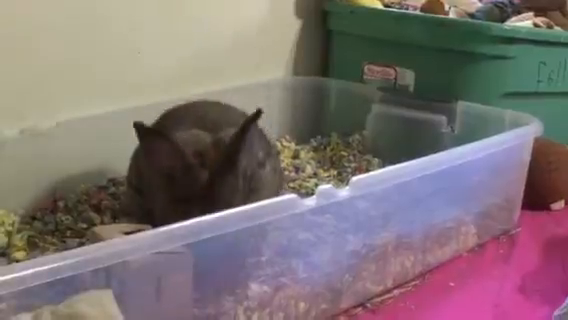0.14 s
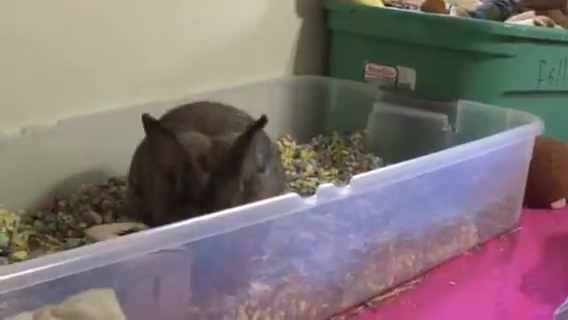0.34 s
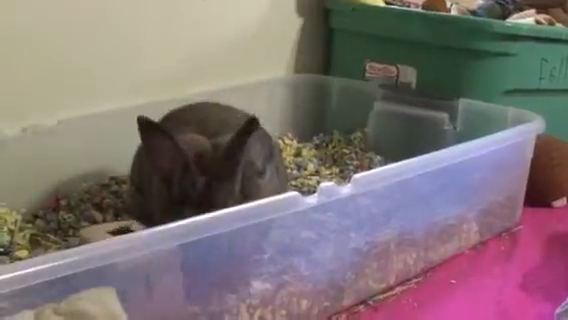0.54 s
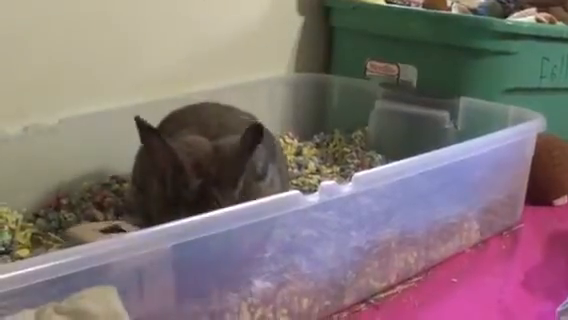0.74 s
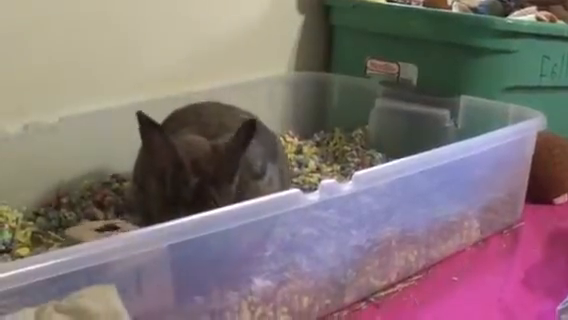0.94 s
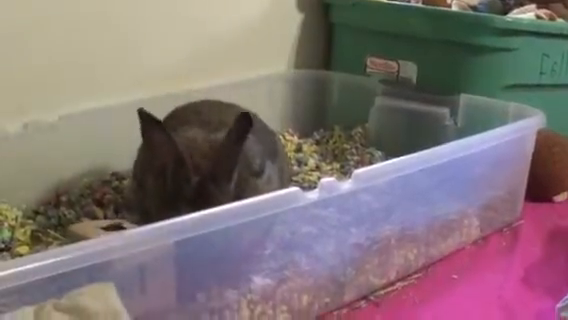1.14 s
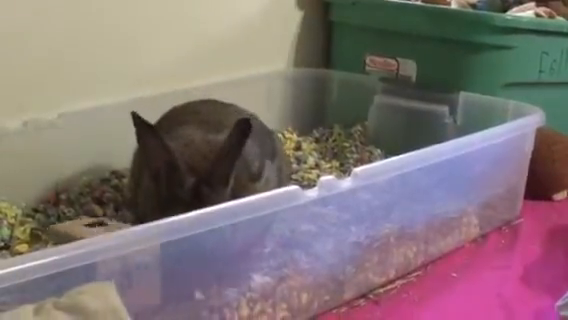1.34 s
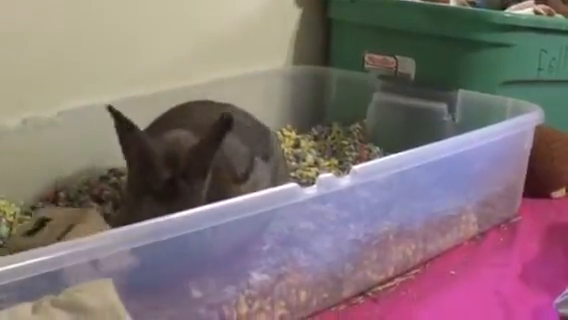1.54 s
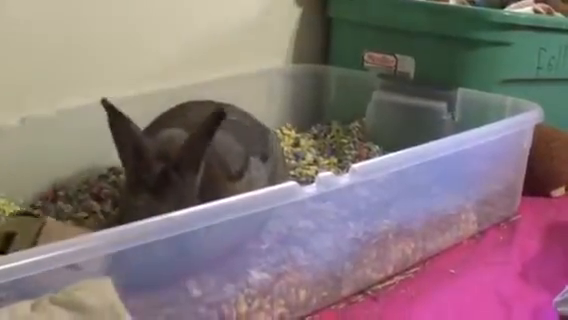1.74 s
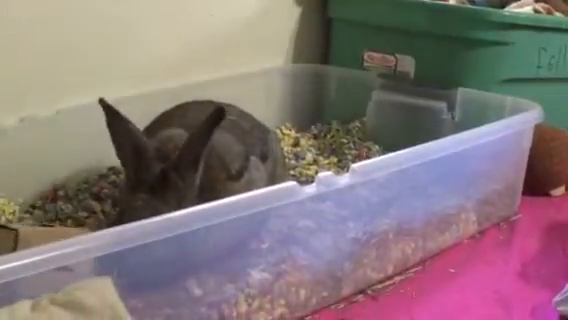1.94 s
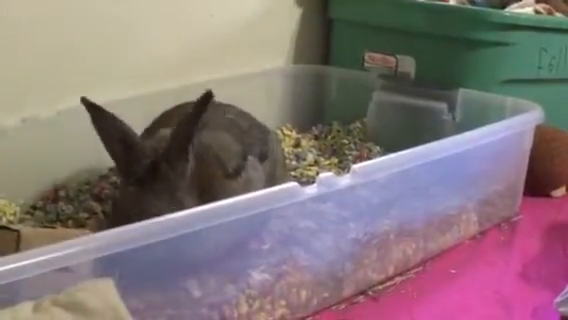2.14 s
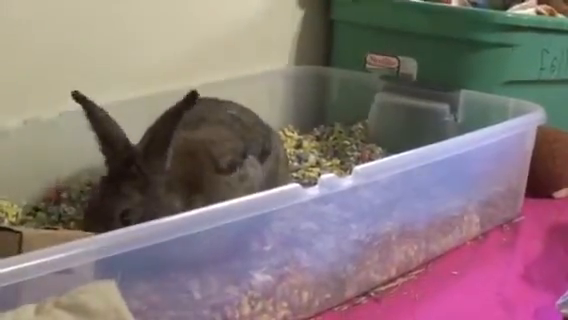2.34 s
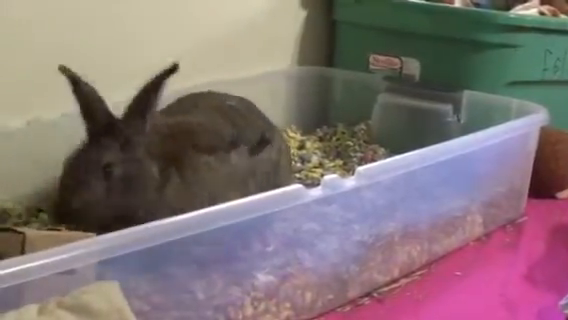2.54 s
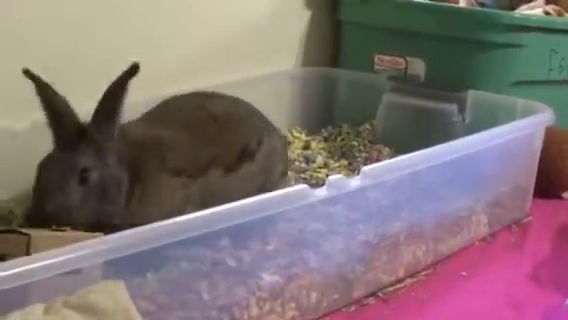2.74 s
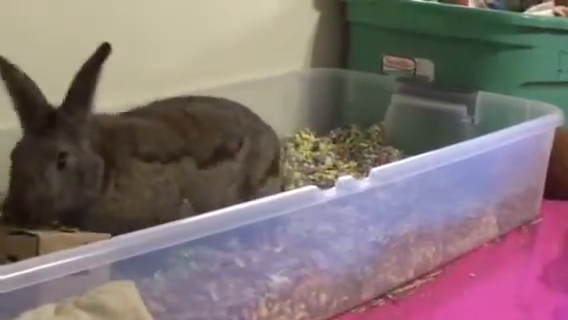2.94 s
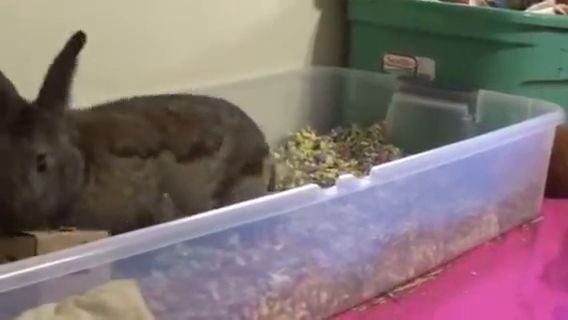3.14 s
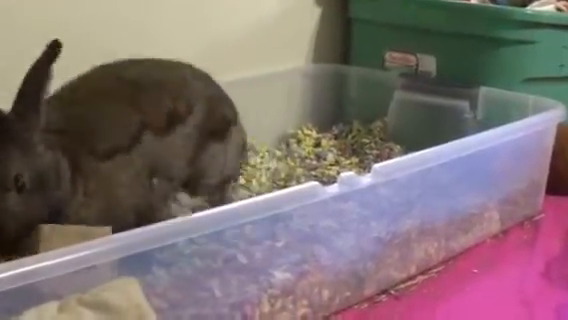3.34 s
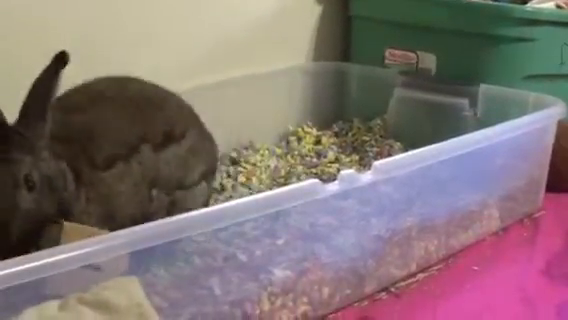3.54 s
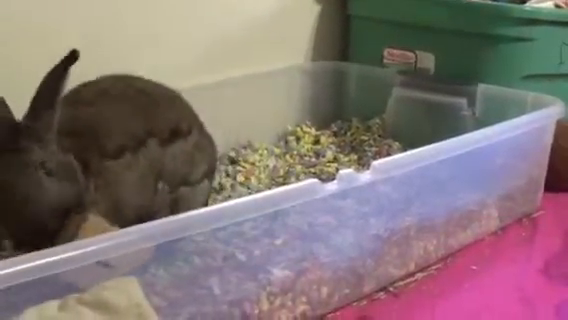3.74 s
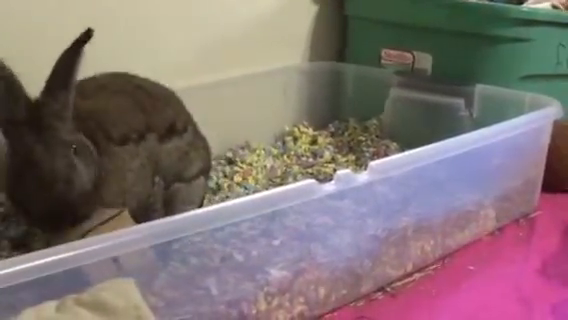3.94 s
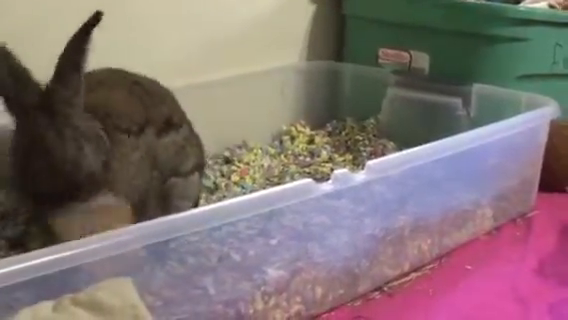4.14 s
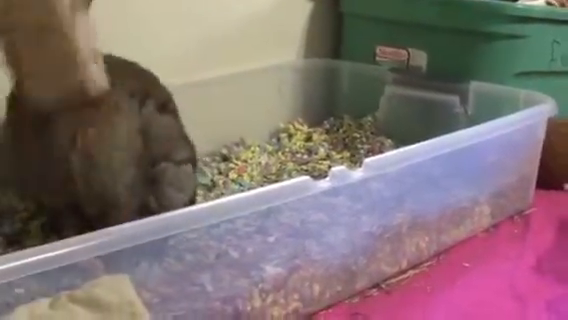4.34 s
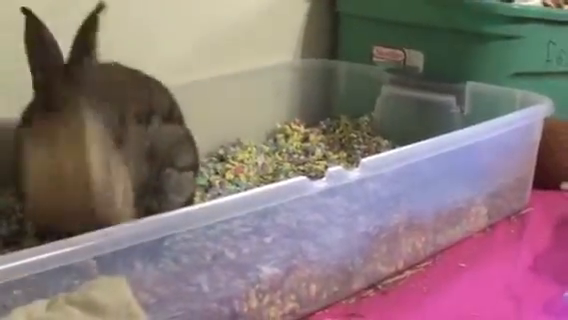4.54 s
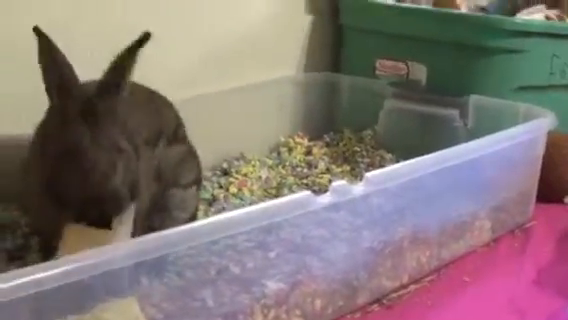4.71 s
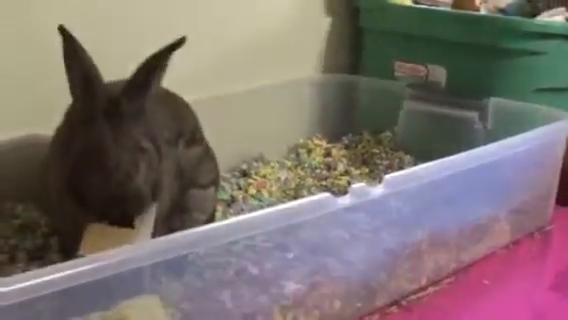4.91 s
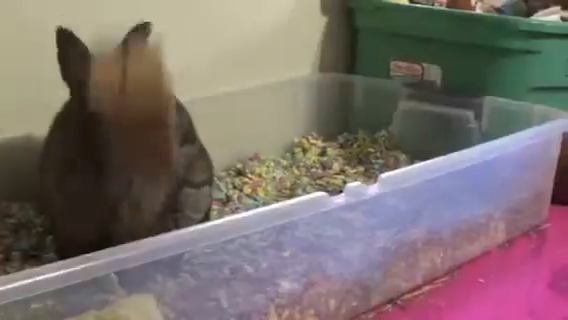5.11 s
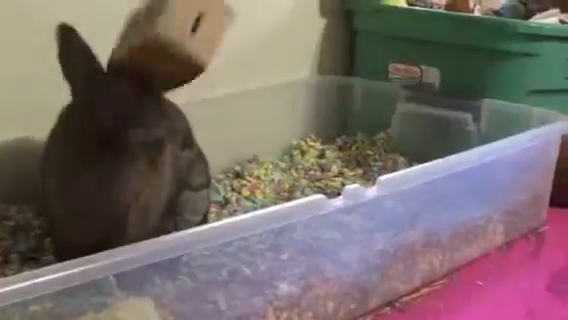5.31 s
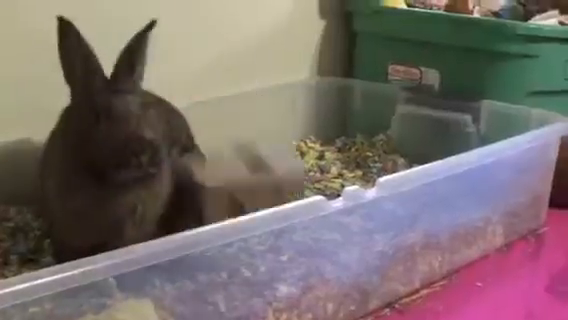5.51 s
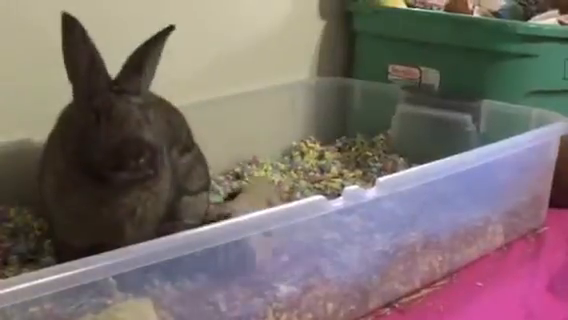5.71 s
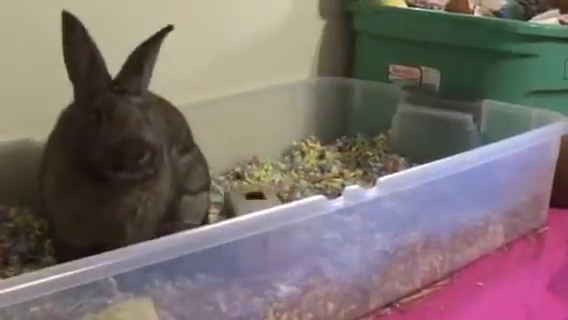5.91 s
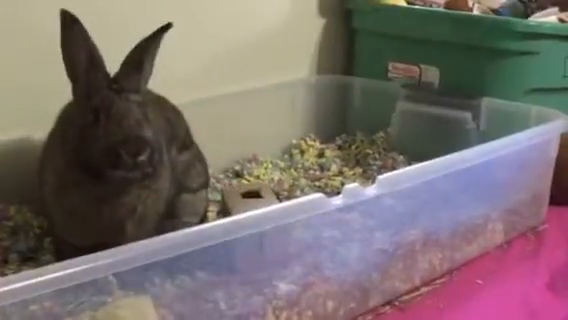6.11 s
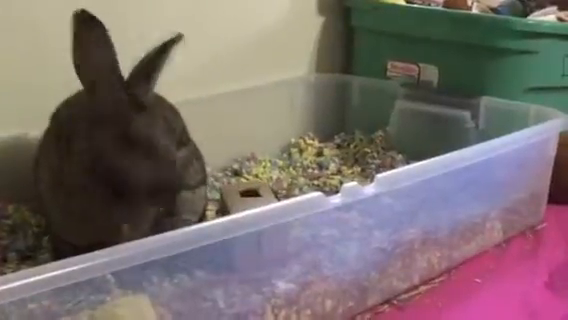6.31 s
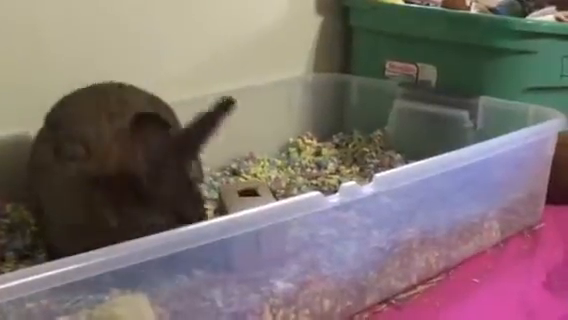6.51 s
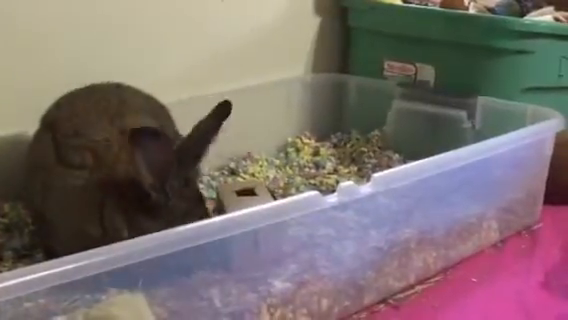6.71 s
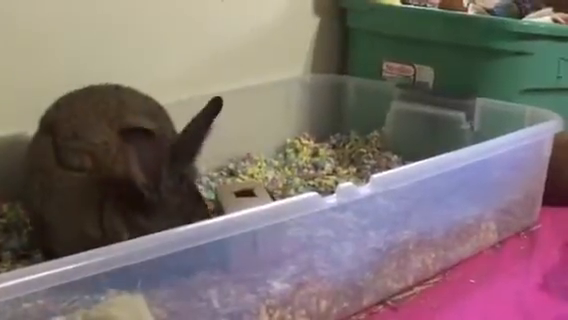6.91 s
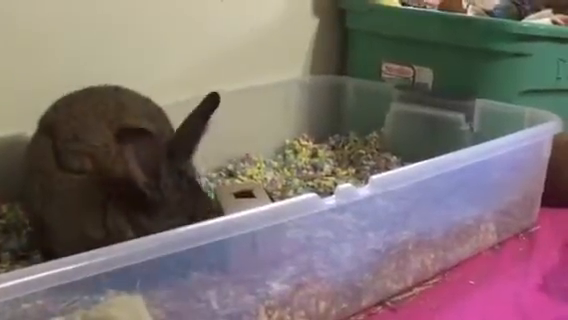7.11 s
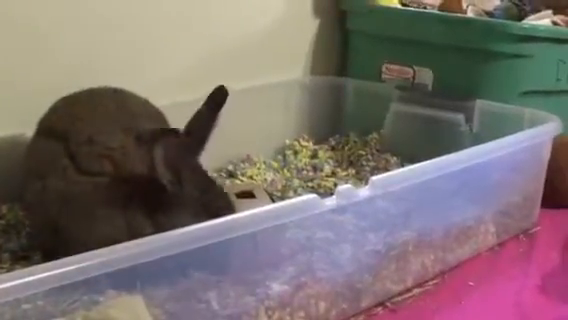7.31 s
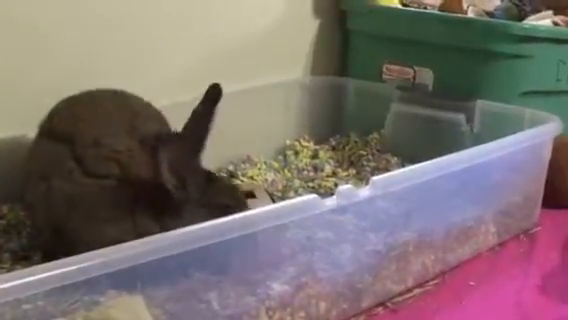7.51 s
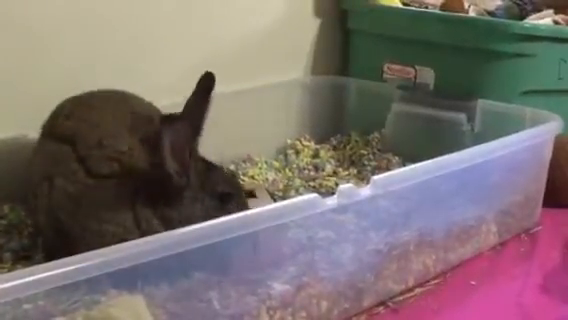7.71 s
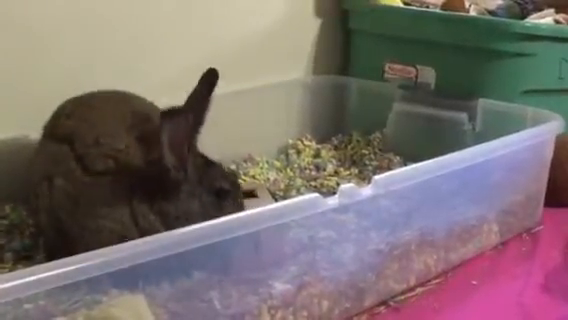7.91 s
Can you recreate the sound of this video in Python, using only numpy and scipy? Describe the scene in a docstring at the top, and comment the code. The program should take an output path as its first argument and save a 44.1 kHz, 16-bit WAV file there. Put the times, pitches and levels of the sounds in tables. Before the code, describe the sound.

A rabbit scrapes and tosses a small cardboard box in a plastic tub, with rustling bedding, sharp knocks and hollow thumps over low room rumble.

```python
"""Soft scrapes and sharp knocks of cardboard: a rabbit drags, shakes and tosses a small box
over loose paper bedding in a plastic tub. Each touch rings the panels of the box and rustles
the bedding, while paws and the landing box thump the tub. Underneath lie the low rumble of
a quiet room and the hiss of the microphone."""
import sys
import numpy as np
from scipy import signal
from scipy.io import wavfile
from scipy.ndimage import uniform_filter1d

SR = 44100
rng = np.random.default_rng(int(sys.argv[2]) if len(sys.argv) > 2 else 0)


def unload_audio(sound):
    """Save the sound as a 16-bit wav file, at the path given as the first command line argument."""
    columns = np.transpose(np.atleast_2d(sound))
    # keep every value between -1 and 1, then stretch to whole-number steps
    steps = np.round(np.clip(columns, -1, 1) * 32767)
    wavfile.write(sys.argv[1], SR, steps.astype(np.int16))


N = 350815

# Drags through the bedding. Each row: crest in seconds, level in dB, swell and fade in seconds per
# 20 dB, rustle in relative dB, pitch of the rubbed panel in Hz. A negative swell leaves a faint tail.
STROKES = [(0.56, -74.5, 0.36, 0.2, -4, 1580), (0.697, -70, 0.05, 0, -11, 1950),
           (0.742, -57.5, 0.0547, 0.14, -7.5, 2130), (0.77, -65, 0.1, 0.18, -13, 1220),
           (0.82, -61.5, 0.21, 0.03, -6, 2100), (0.828, -70, 0.1, 0.03, -12, 1250),
           (0.915, -65, 0, 0.15, -6.5, 2000), (1.12, -73, 0.2, 0.46, -7, 1620),
           (1.395, -63.5, 0.02, 0.04, -4, 1100), (1.43, -61, 0.03, 0.22, -12, 1260),
           (1.476, -55, 0.13, 0.1039, -5.5, 1950), (1.52, -60.5, 0.13, 0.03, -5, 1220),
           (1.67, -67, 0.15, 0.08, -20, 1120), (1.665, -64, 0.05, 0.12, -25, 1830),
           (1.76, -69, 0.05, 0.2, -25, 1830), (1.63, -60, 0.14, 0.157, -9.5, 1940),
           (1.8, -70, 0.1, 0.32, -2.5, 2306), (1.944, -56.5, 0.1, 0.06, -16, 1861),
           (2.115, -73, 0.1138, 0.23, -12, 1858), (2.7, -75, 0.3, 0.3, -6.5, 1400),
           (2.75, -64, 0.01, 0.05, -4, 1600), (2.822, -65, 0.0419, 0.16, -8.5, 1440),
           (3.19, -68.5, 0.06, 0.05, -14, 1816), (3.3, -69, 0.1, 0.06, -11, 1791),
           (3.44, -58, 0.03, 0.14, -6, 1650), (3.48, -55, 0.07, 0.0654, -7.5, 1976),
           (3.608, -62.5, 0.2, 0.0122, -17, 1470), (3.858, -74, 0.1, 0.2, -25, 1177),
           (4.06, -65, 0.5546, 0.26, -7, 1490), (4.185, -64, 0.1, 0.32, -9.5, 2000),
           (4.51, -49, 0.03, 0.05, -14, 1050), (4.559, -48, 0.015, 0.03, -4, 1740),
           (4.522, -46, 0.05, 0.07, -10, 986), (4.569, -35, 0.01, 0.0784, -8, 1190),
           (4.598, -42.5, 0.0356, 0.06, -16, 1140), (4.63, -47, 0.05, 0.08, -14, 1830),
           (4.665, -45.5, 0.16, 0.16, -19, 1490), (4.721, -29.5, 0.0288, 0.0281, -12, 1857),
           (4.7, -41, 0.02, 0.02, -3.5, 1400), (4.744, -40.5, 0.03, 0.0874, -5.5, 2000),
           (4.78, -51.5, 0.055, 0.0743, -9.5, 1320), (5.156, -67.5, 0.2, 0.09, -1, 1540),
           (5.25, -68.5, 0.5, 0, -4, 1271), (5.375, -47.5, 0.0151, 0.197, -12, 1125),
           (5.378, -49, -0.02, 0.09, -17, 1790), (5.428, -44.5, 0.0935, 0.0425, -11, 1360),
           (5.438, -47, 0.07, 0.035, -13, 1770), (5.469, -46.5, 0.04, 0.1135, -14.5, 1040),
           (5.577, -50, 0.0038, 0.05, -5.5, 1270), (5.603, -53, 0.06, 0.05, -14, 1110),
           (5.685, -39.5, -0.02, 0.09, -5.5, 1880), (5.703, -40, 0.02, 0.04, -6, 1300),
           (5.722, -39.5, 0.03, 0.01, -6, 1230), (5.755, -49.5, 0, 0.1177, -10.5, 1302),
           (5.843, -53, -0.04, 0.11, -9, 1280), (5.872, -62, 0.03, 0.06, -8, 1580),
           (5.934, -64.5, 0, 0.14, -5.5, 1245), (6.4, -73.5, 0.5, 0.8, -16, 2053)]


def strokes():
    """Gritty friction swells and fades; returns the drive on the card, the crumbs and each panel."""
    t = np.arange(N) / SR
    rub, crumbs = np.zeros((2, N))
    panels = np.zeros((len(PANEL_MODES), N))
    for s, level_db, swell, fade, rustle_db, hz in STROKES:
        since = t[max(round((s - 2 * swell) * SR), 0):round((s + 2 * fade) * SR)] - s
        start = s + since[0]
        power = gain_of(level_db - 20 * np.maximum(-since / swell, since / fade)) ** 2
        add(rub, start, power)
        add(crumbs, start, gain_of(rustle_db) ** 2 * power)
        for panel, share in zip(panels, panel_shares(hz, reach=.11)):
            add(panel, start, share ** 2 * power)
    contacts = grit(N, per_s=2000, spread_db=1.9)
    crumbs = np.sqrt(crumbs) * grit(N, per_s=3000, spread_db=1.0)
    # The point of contact never stays still, so every panel swells on its own.
    panels = [np.sqrt(panel) * contacts * gain_of(3.2 * drift(16.) - 1.6) for panel in panels]
    return np.sqrt(rub) * contacts, crumbs, panels


def burst(rise_ms=1.3, hold_until_ms=4.26, t60_ms=23):
    """Envelope of a brief contact: fast attack, short hold, exponential release."""
    ms = 1000 * np.arange(6000) / SR
    return np.minimum(ms / rise_ms, 1) * gain_of(-60 * np.maximum(ms - hold_until_ms, 0) / t60_ms)


# Hits on the box. Each row: start in seconds, level in dB, pitch of the struck panel in Hz,
# crackle in relative dB.
KNOCKS = [(0.507, -66, 1150, -8), (0.903, -66, 880, -14), (0.916, -62, 1950, -22), (1.424, -53, 1210, -21),
          (1.451, -60, 1972, -18), (1.616, -61, 1960, -7.5), (1.638, -54, 2670, -2),
          (1.694, -57, 1925, -16), (1.771, -58.5, 2700, -2), (1.784, -57, 3144, -2.5),
          (1.807, -66, 1911, -2.5), (1.903, -55, 1819, -8), (1.932, -44, 1900, -16),
          (1.977, -53.5, 1791, -14), (2.095, -62, 1889, -19), (2.743, -57, 3100, -8),
          (2.82, -58, 1440, -12), (2.976, -62, 790, -15.5), (3.176, -62, 1930, -25),
          (3.478, -54, 2107, -11.5), (3.552, -62.5, 1469, -8), (4.087, -64, 1258, -14),
          (4.04, -66, 2770, -4), (4.17, -63, 2093, -12), (4.259, -66, 3100, -3), (4.461, -62, 859, -11),
          (4.506, -54, 1060, -21), (4.519, -38.5, 940, -11), (4.564, -26.5, 1140, -8),
          (4.571, -28, 1750, -8.5), (4.59, -35.5, 1136, -13), (4.665, -37.5, 1360, -12),
          (4.711, -35, 1890, -11), (4.717, -25, 1880, -28), (4.739, -33, 1913, -16),
          (4.814, -52, 2750, -15), (4.835, -58, 3246, -14.5), (5.135, -66, 1200, -2),
          (5.156, -61, 1879, -8), (5.353, -55, 885, -16), (5.368, -39, 1120, -11.5),
          (5.435, -39.5, 1736, -11), (5.458, -36, 1600, -11.5), (5.525, -52, 2900, -6),
          (5.568, -46, 1790, -3.5), (5.575, -46, 4100, -4.5), (5.679, -42, 4200, -5.5),
          (5.684, -35, 1890, -18), (5.699, -29.5, 3300, -8.5), (5.719, -36.5, 1270, -13),
          (5.74, -46, 1280, -18), (5.799, -49, 1284, -8), (6.09, -60, 1600, -6)]


def knocks():
    """Short gritty blows; returns the drive on the card, the crumbs and each panel."""
    card, crumbs = np.zeros((2, N))
    panels = np.zeros((len(PANEL_MODES), N))
    blow = burst()
    # The crackle has a softer attack than the knock.
    crackle = burst(rise_ms=3, hold_until_ms=3, t60_ms=26)
    for s, level_db, hz, crackle_db in KNOCKS:
        contact = gain_of(level_db) * blow * grit(len(blow), per_s=2800, spread_db=2.0)
        add(card, s, contact)
        add(crumbs, s, gain_of(level_db + crackle_db) * crackle * rng.standard_normal(len(crackle)))
        for panel, share in zip(panels, panel_shares(hz, reach=.13)):
            add(panel, s, share * contact)
    return card, crumbs, panels


# Resonances of the box. Each row: pitch in Hz, width in Hz, level in dB.
PANEL_MODES = [(620, 110, -9), (880, 85, 0), (1050, 60, 1), (1207, 78, 2), (1339, 75, 2.5), (1440, 70, -1),
               (1600, 110, -3), (1760, 100, 1.5), (1901, 86, 2.5), (2050, 150, 0), (2380, 130, -4),
               (2780, 120, -6), (3100, 130, -2.5), (3510, 130, -10), (4220, 150, -16)]
# Dull tone of the card between its modes. Each row: frequency in Hz, spectral level in dB.
CARD_SPECTRUM = [(150, -45), (330, -9), (520, -16), (1150, 0), (1560, -3), (1900, 1), (2400, -7),
                 (5000, -17.5), (6500, -60), (11000, -110)]


def box(card_drive, rubbed, struck):
    """Rubbed and struck panels ring over the dull body of the cardboard."""
    held_damping = 2.18  # teeth or bedding hold a knocked panel, widening its modes
    modes = np.zeros(N)
    for k, (hz, width, _) in enumerate(PANEL_MODES):
        width = max(width, hz / 30)
        modes += (-1) ** k * (ring(rubbed[k], hz, width) + ring(struck[k], hz, held_damping * width))
    return modes + gain_of(-9) * colour(card_drive, CARD_SPECTRUM)


def panel_shares(hz, reach, focus=4.):
    """A touch spreads over all panels, favouring those pitched near hz."""
    mode_hz, _, db = np.transpose(PANEL_MODES)[:, :, None]
    weight = gain_of(db) * (1 + focus * np.exp(-(np.log(mode_hz / hz) / reach) ** 2))
    return weight / np.linalg.norm(weight, axis=0)


# Bright rustle of the paper. Each row: frequency in Hz, spectral level in dB.
RUSTLE_SPECTRUM = [(700, -48), (1400, -21.5), (2060, -6.5), (3500, -2), (4200, -6.5), (4970, -8.5),
                   (5780, -8), (7290, -10.5), (9480, -9), (10500, -15), (13000, -17), (15700, -24)]


def bedding(drive):
    """Pushed paper crumbs rustle, and their own short rings add a flickering crunch."""
    crunch = np.zeros(N)
    for hz in np.geomspace(2470, 7070, num=8):
        flicker = gain_of(3.5 * drift(per_s=52))
        crunch += 2500 / hz * ring(drive * flicker, hz, width=148)
    return colour(drive, RUSTLE_SPECTRUM) + gain_of(-15.5) * crunch


# Crisp accents in the bedding. Each row: start in seconds, level in dB, pitch in Hz.
SNAPS = [(1.638, -56, 3600), (1.638, -56, 4400), (1.638, -58.5, 6100), (1.772, -58, 6050),
         (1.785, -60, 4100), (1.804, -62, 6050), (4.57, -38, 4150), (5.369, -52, 4650), (5.458, -48, 5600),
         (5.699, -37, 2800), (5.798, -57, 5000), (5.936, -64, 4200)]


def snaps():
    """Single crumbs snap, each a tick of noise ringing at its own pitch."""
    out, shape = np.zeros(N), burst()
    for s, level_db, hz in SNAPS:
        tick = gain_of(level_db) * shape * rng.standard_normal(len(shape))
        add(out, s, ring(tick, hz, width=300))
    return out


# Thumps on the tub floor. Each row: start in seconds, level in dB, wall modes in relative dB,
# length of the push in milliseconds.
THUMPS = [(2.817, -35.5, 2.5, 6.025), (2.976, -49, 5, 2.494), (3.174, -29, -1.5, 7.8),
          (3.395, -43.5, -14, 6.8), (3.572, -53.5, 16, 5.613), (3.599, -47, 7, 4.666),
          (4.568, -49, 18, 2.5), (4.716, -49, 18, 2.5), (5.684, -20.5, 0.5, 6.4), (5.7, -35, 11, 3)]
# Resonances of the tub. Each row: pitch in Hz, width in Hz, level in dB.
TUB_MODES = [(57, 27, -6), (112, 91, 4.5), (131.6, 47, 4.5), (245, 53.6, -8), (380, 46, -12.5),
             (523, 56, -17.5), (676, 135, -6.5)]


def tub():
    """A soft push sets the plastic floor and the higher wall modes swinging."""
    out, t = np.zeros(N), np.arange(9000) / SR
    for s, level_db, wall_db, push_ms in THUMPS:
        # A mode loses 27.3 dB a second for each Hz of width.
        swing = sum(gain_of(db + wall_db * (hz > 200) - 27.3 * width * t) * np.sin(2 * np.pi * hz * t)
                    for hz, width, db in TUB_MODES)
        attack = 1 - np.exp(-(1000 * t / push_ms) ** 2)
        add(out, s, -gain_of(level_db) * swing * attack)
    return out


# Faint squeaks, perhaps of bent cardboard. Each row: start in seconds, length in seconds,
# pitch in Hz, level in dB, octave in relative dB.
CREAKS = [(1.326, 0.04, 2100, -64, -31), (3.773, 0.0773, 476, -69, -9), (3.811, 0.06, 1400, -67.5, -30),
          (3.819, 0.11, 557, -61, -7.5), (4.072, 0.091, 548, -67, -19), (4.321, 0.042, 470, -60.5, -19),
          (4.87, 0.051, 2002, -67, -32.5), (7.799, 0.065, 291, -63, -27)]


def creaks():
    """Soft tones with their octave; the higher the squeak, the more it frays."""
    out = np.zeros(N)
    for s, length, hz, db, octave_db in CREAKS:
        t = np.arange(0, length, 1 / SR)
        fray = uniform_filter1d(rng.standard_normal((2, len(t))), 300, axis=1)
        jitter, shimmer = unit_rms(fray) * hz / 2500
        phase = 2 * np.pi * hz * t + jitter
        tone = (np.sin(phase) + gain_of(octave_db) * np.sin(2 * phase)) * (1 + .6 * shimmer)
        add(out, s, gain_of(db) * tone * np.hanning(len(t)))
    return out


# Short tail of the room. Each row: frequency in Hz, seconds to fall by 60 dB.
ROOM_DECAY = [(300, 0.22), (2000, 0.088), (10000, 0.15)]


def room(x):
    """Sparse echoes of random sign, each band dying at its own speed."""
    echoes = np.zeros(SR // 2)
    slots = np.arange(200, SR // 2 - 20, 20)
    echoes[slots + rng.integers(0, 20, len(slots))] = rng.choice([-1., 1.], len(slots))
    hz, t, bands = signal.stft(echoes, SR, nperseg=256)
    decay = gain_of(-60 * t / curve_at(ROOM_DECAY, hz)[:, None])
    tail = signal.istft(bands * decay, SR, nperseg=256)[1]
    return signal.oaconvolve(x, tail / np.linalg.norm(tail))[:N]


# Low room tone. Each row: frequency in Hz, spectral level in dB.
RUMBLE_SPECTRUM = [(20, -38), (30, -16), (40, -4.5), (56, 3.5), (68, -6.5), (80, -4), (113, 0), (150, -3.5),
                   (180, -19), (225, -14.5), (295, -18.5), (360, -23), (550, -33), (800, -32.5),
                   (1100, -67)]
# Its fader ride. Each row: time in seconds, level in dB.
RUMBLE_RIDE = [(0.0, -57), (5.9, -57), (6.3, -59), (7.95, -58.5)]


def rumble():
    """Lumpy rumble of the house, its three bands swelling partly together."""
    level_db = np.interp(np.arange(N) / SR, *np.transpose(RUMBLE_RIDE))
    whole = colour(rng.standard_normal(N), RUMBLE_SPECTRUM)
    deep, low = [signal.sosfiltfilt(signal.butter(3, hz, fs=SR, output="sos"), whole)
                 for hz in (70, 170)]
    shared, out = drift(4.7), np.zeros(N)
    for band, flutter_db, per_s in (deep, 3.5, 6), (low - deep, 3, 10.5), (whole - low, 1, 4):
        out += band * gain_of(flutter_db * (.6 * shared + .8 * drift(per_s)))
    return gain_of(level_db - 1) * out


# Noise floor. Each row: frequency in Hz, spectral level in dB.
HISS_SPECTRUM = [(290, -28.5), (500, -6.5), (594, -11.5), (804, -18), (943, -10.5), (1170, -12),
                 (1560, -13), (1780, -13.5), (5630, -19), (15700, -26.5)]
# Fuzzy background tones. Each row: pitch in Hz, width in Hz, level in dB.
WHINES = [(545, 8.3, -87), (966, 19, -90)]


def hiss():
    """Smooth microphone hiss with two faint, steady whines."""
    floor = gain_of(-75) * colour(rng.standard_normal(N), HISS_SPECTRUM)
    return floor + sum(gain_of(db) * ring(rng.standard_normal(N), hz, width) for hz, width, db in WHINES)


def gain_of(db):
    """Decibels to a factor."""
    return 10 ** (np.asarray(db) / 20)


def unit_rms(x):
    """Scales to rms 1."""
    return x / np.sqrt(np.mean(x ** 2) + 1e-20)


def curve_at(points, hz):
    """Reads a curve on a log-frequency axis."""
    point_hz, value = np.transpose(points)
    return np.interp(np.log(hz + 1), np.log(point_hz + 1), value)


def add(mix, s, sound):
    """Mixes a sound in at s seconds."""
    part = mix[round(s * SR):][:len(sound)]
    part += sound[:len(part)]


def colour(x, spectrum):
    """Minimum-phase EQ that keeps the rms of white noise."""
    log_gain = np.log(gain_of(curve_at(spectrum, abs(np.fft.fftfreq(32768, 1 / SR)))))
    response = np.exp(np.conj(signal.hilbert(log_gain)))
    taps = np.fft.ifft(response).real[:16384]
    return signal.oaconvolve(x, taps / np.linalg.norm(taps))[:N]


def ring(x, hz, width):
    """One resonance, its width in Hz; keeps the rms of white noise."""
    r = np.exp(-np.pi * width / SR)
    feedback = [1, -2 * r * np.cos(2 * np.pi * hz / SR), r * r]
    return signal.lfilter([1, 0, -1], feedback, x) * np.sqrt((1 - r * r) / 2)


def drift(per_s):
    """Smooth random modulation of rms 1."""
    steps = rng.standard_normal(N // 64 + 2)
    smooth = signal.lfilter(*signal.butter(2, per_s * 128 / SR), steps)
    return np.interp(np.arange(N) / 64, np.arange(len(steps)), unit_rms(smooth))


def grit(size, per_s, spread_db):
    """Tiny slips of paper: dense noise grains of uneven strength."""
    strength = gain_of(spread_db * np.minimum(rng.exponential(1, size), 5))
    slips = strength * (rng.random(size) < per_s / SR)
    return unit_rms(signal.lfilter([1], [1, -.95], slips) * rng.standard_normal(size))


def scene():
    """Everything in the tub, its echoes and the background, in mono."""
    rub, rustle, rubbed = strokes()
    near = snaps()
    blows, crackle, struck = knocks()
    near += box(rub + blows, rubbed, struck) + bedding(rustle + crackle) + tub() + creaks()
    return (near + gain_of(-7) * room(near) + rumble() + hiss())[None]


# Dips of the microphone housing. Each row: centre in Hz, half width in Hz, gain in dB.
HOUSING_DIPS = [(4860, 320, -3), (7200, 490, -2), (10380, 124, -17.5)]


def record(dry):
    """The microphone cuts the deep bass and top treble, and its housing carves narrow dips."""
    hz = np.linspace(0, SR / 2, 1025)
    dips_db = sum(db * np.exp(-((hz - centre) / width) ** 2) for centre, width, db in HOUSING_DIPS)
    housing = signal.firwin2(511, hz, gain_of(dips_db), fs=SR)
    high_cut = signal.firwin(1023, 15800, window=("kaiser", 9), fs=SR)
    thinned = signal.sosfilt(signal.butter(2, 32, "high", fs=SR, output="sos"), dry)
    return signal.oaconvolve(thinned, np.convolve(housing, high_cut)[None], "same")


dry = scene()
out = record(dry)
unload_audio(out)
```